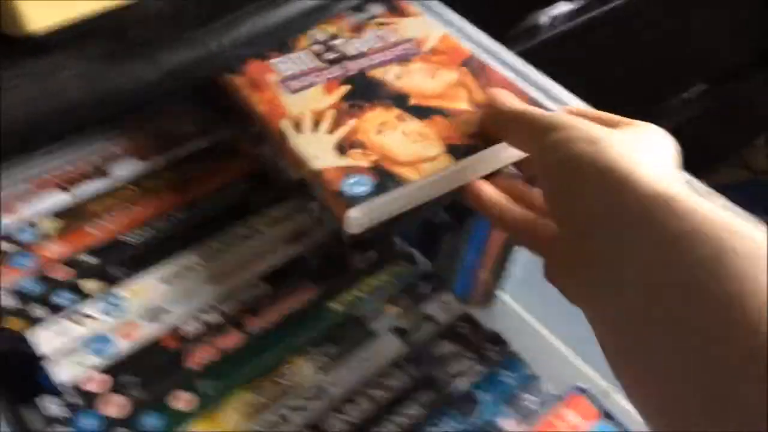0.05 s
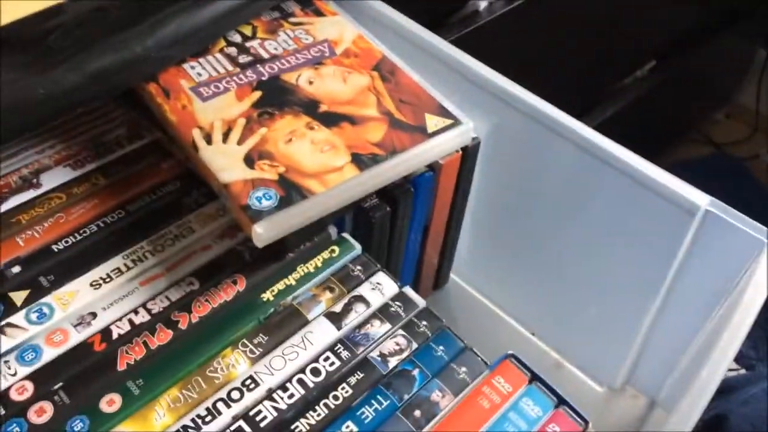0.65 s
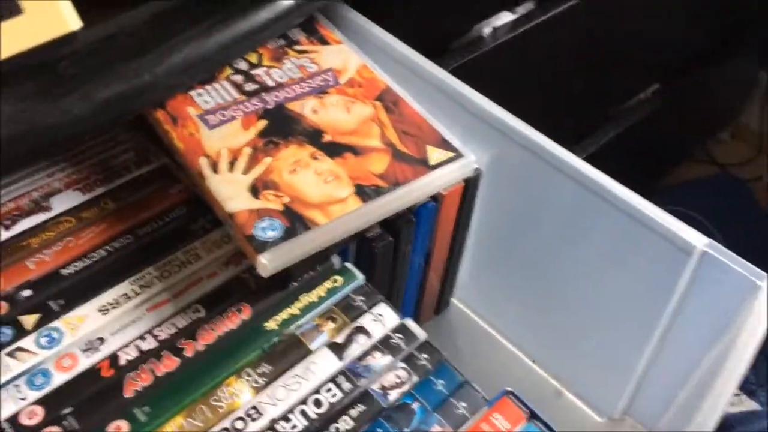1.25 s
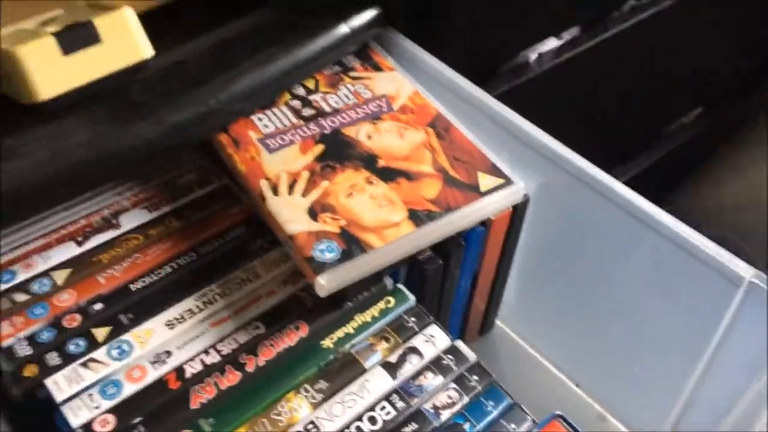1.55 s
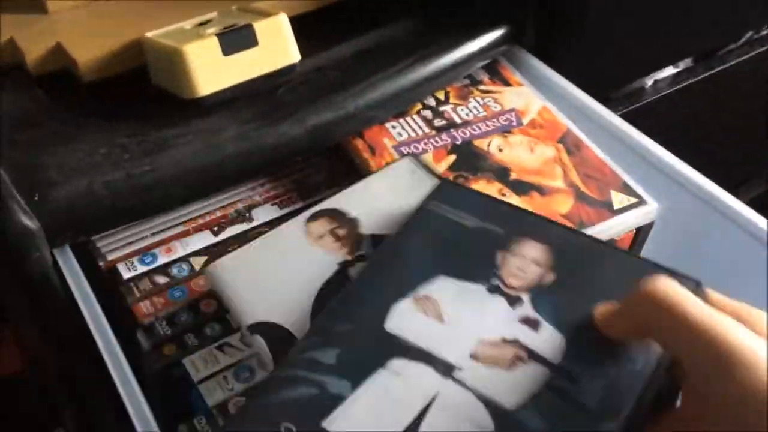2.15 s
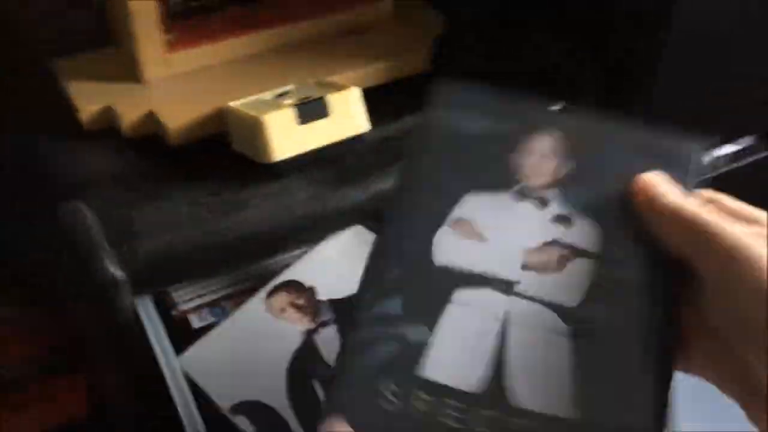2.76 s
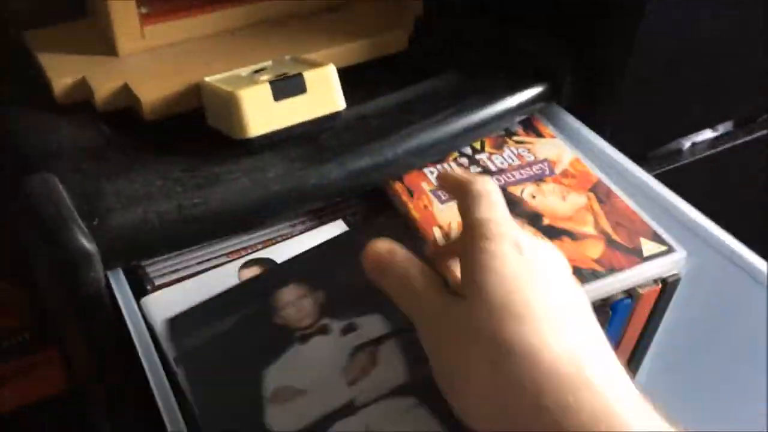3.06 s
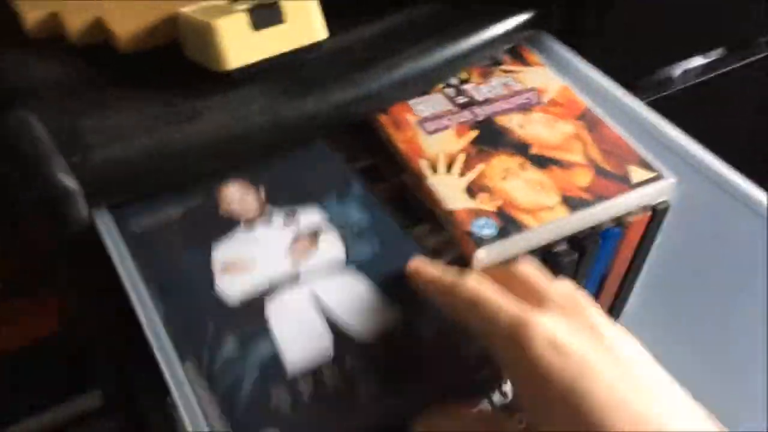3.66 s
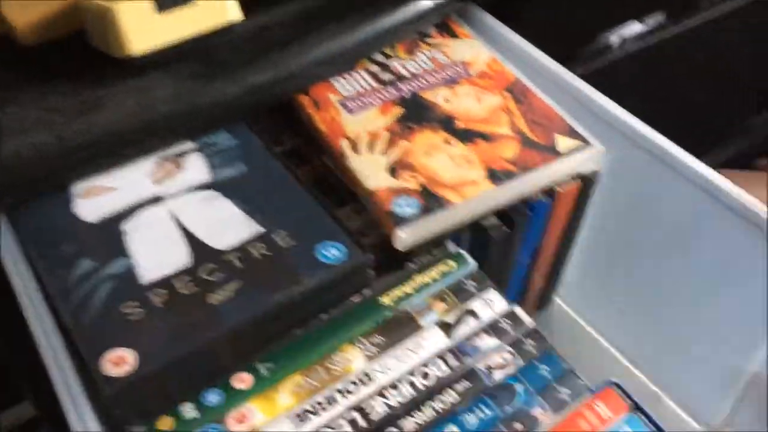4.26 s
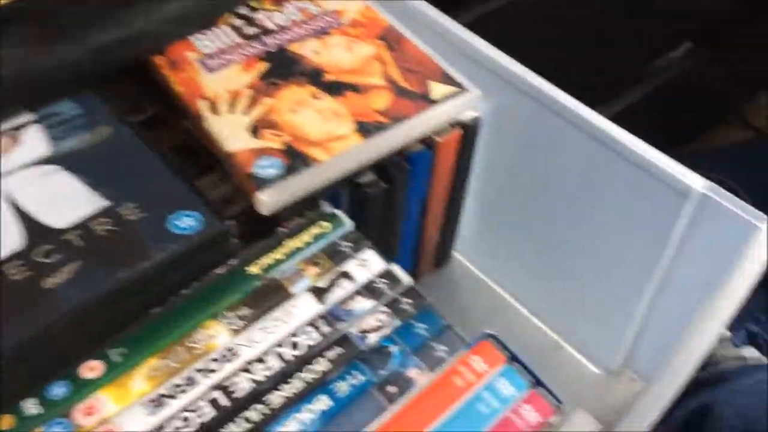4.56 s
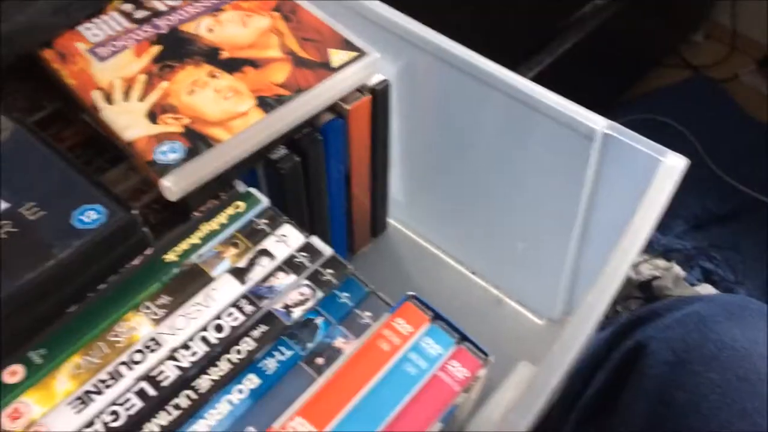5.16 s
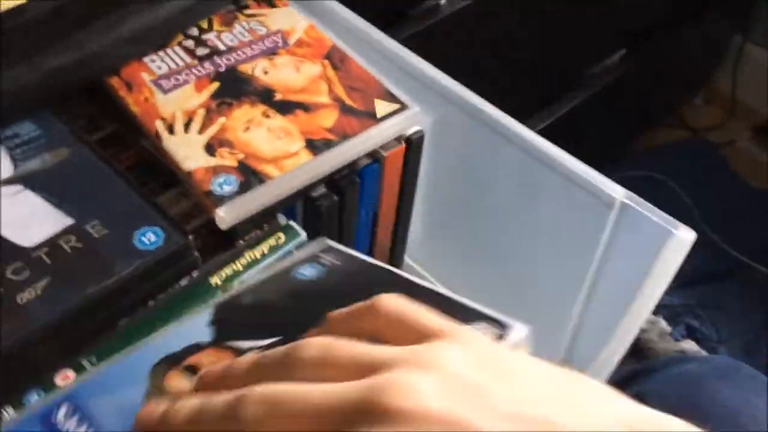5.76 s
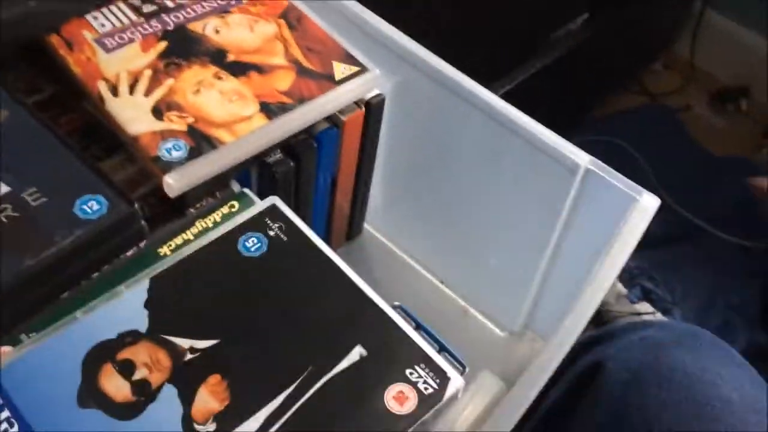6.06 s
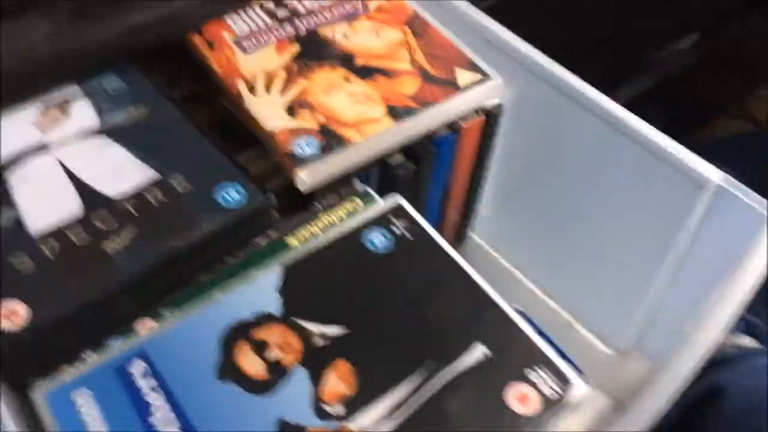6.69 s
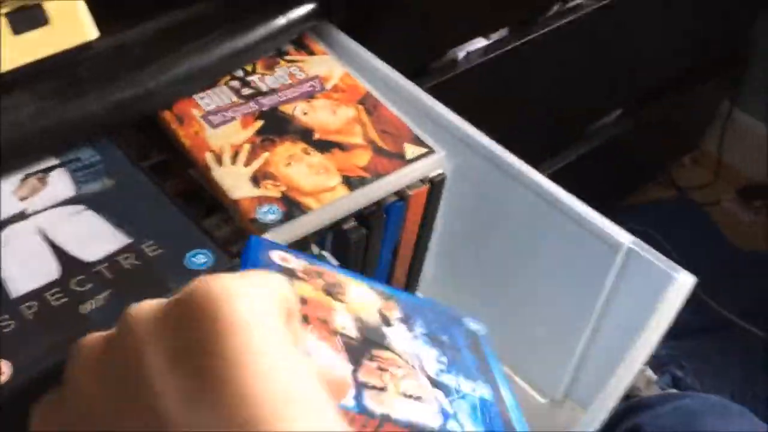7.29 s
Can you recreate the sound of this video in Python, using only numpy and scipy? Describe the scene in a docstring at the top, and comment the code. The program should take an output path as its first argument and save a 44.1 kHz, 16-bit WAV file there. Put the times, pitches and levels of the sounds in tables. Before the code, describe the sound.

Plastic disc cases are handled in a plastic storage drawer, close to the microphone. A quick clatter opens, followed by light ticks, then about two seconds of busy clacking and scraping, with hollow thuds from the drawer. After a lull, a case drops with a sharp clatter, and one more clack comes near the end. A sleeve rustles faintly in the quiet, small room.

```python
"""Disc cases in a plastic drawer

Plastic cases are lifted, shuffled and dropped close to the microphone. Their shells clack
together and the hollow drawer thuds under them; between blows they scrape, tick and skid
by stick-slip. A sleeve rustles faintly, and a small furnished room answers."""
import sys
import numpy as np
from scipy import signal
from scipy.fft import rfft, irfft
from scipy.io import wavfile
from scipy.ndimage import uniform_filter1d

SR = 44100
rng = np.random.default_rng(int(sys.argv[2]) if len(sys.argv) > 2 else 0)


def digitize_waveform(pressure):
    """Quantize a signal to 16-bit integers and store it at the path in sys.argv[1].

    Rows of a 2-D input are taken as channels; values are limited to [-1, 1].
    """
    field = np.atleast_2d(pressure).T
    bounded = np.clip(field, -1, 1)
    quanta = np.round(bounded * 32767).astype(np.int16)
    wavfile.write(sys.argv[1], SR, quanta)


N = 323253
TIME_S = np.arange(N) / SR
BLOW_SAMPLES = round(0.008 * SR)

# hand pushes a case along its neighbours: (peak time [s], level [dB], build-up [s], let-go [s])
PUSHES = [(.04, -35.5, 0.093, 0.32), (.97, -56, 0.26, 0.095), (1.32, -50, 0.3, 0.21),
          (1.65, -45, 0.21, 0.076), (1.92, -42.5, 0.14, 0.13), (2.26, -35, 0.14, 0.037),
          (2.48, -31.5, 0.079, 0.36), (2.68, -34.5, 0.14, 0.12), (3.1, -25.5, 0.12, 0.043),
          (3.27, -32, 0.14, 0.049), (3.71, -48.5, 0.36, .3), (3.98, -39.5, 0.055, 0.06),
          (4.47, -64, .1, 0.22), (4.95, -59, 0.31, .2), (5.31, -51, 0.37, 0.21), (6.0, -39.5, 0.12, 0.23),
          (6.66, -56, 0.34, 0.73), (7.27, -39, 0.11, 0.24)]


def amp(db):
    """Decibels to gain."""
    return 10 ** (np.asarray(db) / 20)


def unit_rms(x):
    """Scale to rms 1."""
    return x / np.sqrt(np.mean(x ** 2) + 1e-20)


def unit_blow(x):
    """Scale to the energy of BLOW_SAMPLES at rms 1."""
    return x * np.sqrt(BLOW_SAMPLES / (np.sum(x ** 2) + 1e-20))


def lookup(points, hz):
    """Interpolate a table over log frequency."""
    points_hz, values = np.transpose(points)
    return np.interp(np.log(hz + 1), np.log(points_hz + 1), values)


def add(mix, start_s, sound):
    """Mix a sound in at start_s."""
    part = mix[max(round(start_s * SR), 0):][:len(sound)]
    part += sound[:len(part)]


def band(x, low_hz, high_hz):
    """Causal band-pass."""
    return signal.sosfilt(signal.butter(3, [low_hz, high_hz], "band", fs=SR, output="sos"), x)


def coloured(x, db_at, size=4096):
    """Minimum-phase filter with response db_at(hz)."""
    log_gain = np.log(amp(db_at(abs(np.fft.fftfreq(size, 1 / SR)))))
    taps = np.fft.ifft(np.exp(np.conj(signal.hilbert(log_gain)))).real
    return signal.oaconvolve(x, taps[:size // 2])[:len(x)]


def noise(spectrum):
    """Steady coloured noise, rms 1."""
    return unit_rms(coloured(rng.standard_normal(N), lambda hz: lookup(spectrum, hz)))


def wander(rate_hz, size=4096):
    """Slow random drift, rms 1."""
    t = np.linspace(0, N / SR, size)
    lowpass = np.exp(-(np.fft.rfftfreq(size, t[1]) / rate_hz) ** 2)
    drift = irfft(rfft(rng.standard_normal(size)) * lowpass)
    return np.interp(TIME_S, t, unit_rms(drift))


def hump(hz, centre_hz, width_hz):
    """Resonance shape, 1 at its centre."""
    return 1 / (1 + (2 * (hz - centre_hz) / width_hz) ** 2)


def slips(per_s, spread_db):
    """Random stick-slip clicks, a few of them large."""
    sizes = amp(spread_db * np.minimum(rng.exponential(1, N), 4))
    return sizes * rng.choice([-1, 1], N) * (rng.random(N) < per_s / SR)


def effort_db(efforts, swell_db=20, curve=1.35):
    """Strongest effort at each instant; each spans swell_db over its build-up and its let-go."""
    levels_db = [db - swell_db * np.maximum((peak_s - TIME_S) / up_s, (TIME_S - peak_s) / down_s) ** curve
                 for peak_s, db, up_s, down_s in efforts]
    return np.max(levels_db, axis=0)


def shell_db(hz):
    """Response of a case: narrow modes on a broad slope."""
    # broad response: (frequency [Hz], gain [dB])
    slope = [(120, -3.5), (300, 1), (560, -0.5), (900, 3.5), (1500, 5), (2400, 1), (3300, -3.5),
             (3850, -11), (4350, -15), (7500, -18), (11000, -22.5), (15000, -33)]
    # shell modes: (frequency [Hz], width [Hz], gain re slope [dB])
    modes = [(668, 35, 3), (897, 58, 2.5), (1004, 50, 3.5), (1220, 76, -1), (1759, 30, -0.5),
             (2070, 87, 1.5), (2580, 7, 4), (3100, 25, 5), (3520, 30, -3.5), (5000, 41, 3), (5440, 38, 1.5),
             (5820, 65, 2), (6400, 110, 3), (7370, 160, 2), (9350, 80, -0.5)]
    return lookup(slope, hz) + sum(db * hump(hz, mode_hz, width_hz) for mode_hz, width_hz, db in modes)


def scrape(gain_db=-2, grip_db=4, grip_hz=35, bite_db=-47, bite_range_db=3):
    """Fingers rub dully; under more pressure the plastic bites and slips ring the shells."""
    # fingers on a case: (frequency [Hz], gain [dB])
    fingers = [(150, -11), (300, -8.5), (480, -4.5), (650, -5), (900, 0.5), (1400, -7), (2150, -5),
               (2800, -16.5), (4000, -20.5), (12000, -42.5)]
    push_db = effort_db(PUSHES)
    bite = 1 / (2 + np.exp((bite_db - push_db) / bite_range_db))
    friction = slips(per_s=700, spread_db=5) * amp(grip_db * wander(grip_hz))
    plastic = unit_rms(band(coloured(friction, shell_db), 280, 3800))
    skin = unit_rms(coloured(friction, lambda hz: lookup(fingers, hz)))
    return amp(gain_db + push_db) * (bite * plastic + (1 - bite) * skin)


def hiss_and_rumble(hiss_db=-2.5, rumble_db=-2, sway_db=-3.5, flutter_db=3, lumps_db=3):
    """Soft high hiss of sleeve swishes and a knock's brief tail; the jostled drawer rumbles."""
    # sleeve swishes and one hissy knock tail: (peak time [s], length [s], relative level [dB])
    hiss_swells = [(0.101, 0.22, -44.5), (0.368, 0.066, -50), (0.894, 0.29, -59), (1.363, 0.34, -61),
                   (1.647, 0.13, -56.5), (2.18, 0.38, -60), (2.51, 0.25, -47.5), (2.81, 0.072, -50.5),
                   (3.092, 0.23, -51.5), (3.506, 0.2, -54.5), (3.848, .2, -48.5), (4.89, 0.28, -61),
                   (5.236, 0.38, -61), (5.6, .24, -68.5), (6.04, .16, -53.5), (6.641, 0.52, -59),
                   (7.3, 0.38, -61)]
    # high hiss: (frequency [Hz], gain [dB])
    hiss_spectrum = [(1000, -12), (3000, -6), (5500, 8), (8000, 3.5), (12500, -0.5), (15500, -9.5)]
    # drawer jostles: (peak time [s], relative level [dB], build-up [s], let-go [s])
    jostles = [(.2, -24, 0.054, 0.043), (.88, -56.5, 0.19, 0.28), (2.14, -46, 0.14, .18),
               (2.58, -41.5, 0.18, 0.23), (3.84, -47.5, 0.21, .1), (4.55, -57.5, .1, 0.11),
               (6.0, -33.5, 0.063, 0.14), (6.14, -41.5, .1, 0.051), (6.6, -61.5, 0.2, 0.45),
               (7.33, -51, .12, .1)]
    # drawer rumble: (frequency [Hz], gain [dB])
    rumble_spectrum = [(20, -5.5), (45, -5), (80, 1), (190, 6.5), (290, -7), (420, -16), (800, -24),
                       (2000, -36.5)]
    envelope = sum(amp(db) * np.exp(-(2 * (TIME_S - peak_s) / length_s) ** 2)
                   for peak_s, length_s, db in hiss_swells)
    grains = slips(per_s=4000, spread_db=4) * amp(flutter_db * wander(rate_hz=40))
    hiss = unit_rms(coloured(grains, lambda hz: lookup(hiss_spectrum, hz)))
    shaking = amp(effort_db(jostles)) + amp(sway_db) * envelope
    rumble = unit_rms(noise(rumble_spectrum) * amp(lumps_db * wander(rate_hz=25)))
    return amp(hiss_db) * envelope * hiss + amp(rumble_db) * shaking * rumble


def even_burst(burst, blur_hz=900):
    """Flatten a noise burst's broad spectrum so each clack keeps its set tone colour."""
    hz = np.fft.rfftfreq(len(burst), 1 / SR)
    power = uniform_filter1d(abs(rfft(burst)) ** 2, max(round(blur_hz / hz[1]), 1))
    flatten_db = -10 * np.log10(abs(power) + 1e-12)
    return coloured(burst, lambda f: np.interp(f, hz, flatten_db), size=512)


def clack(face_db, body_db, edge_db, ring_hz, t60_s, chatter, ring_db=8, trim_db=-1.5):
    """Two shells snap together and buzz briefly; the struck spot favours one resonance."""
    t = np.arange(len(chatter)) / SR
    rise_s = 0.0024 * (t60_s / 0.055) ** 2  # glancing blows start softly and last longer
    closing = 1 - np.exp(-t / rise_s)
    force = even_burst(chatter * closing * amp(-60 * t / t60_s))
    shell = coloured(force, lambda hz: shell_db(hz) + ring_db * hump(hz, ring_hz, 0.19 * ring_hz))
    body = amp(body_db + trim_db) * unit_blow(band(shell, 250, 720))
    face = unit_blow(band(shell, 700, 4600))
    edge = amp(edge_db + trim_db) * unit_blow(band(shell, 4900, 17000))
    return amp(face_db) * (body + face + edge)


def ticks(count=55, tick_db=-50.5, ref_push_db=-46, db_per_db=0.96, spread_db=1.5, crowding=0.45):
    """Fingers and loose cases catch at random, louder and denser under a harder push."""
    out, push_db = np.zeros(N), effort_db(PUSHES)
    travel = np.cumsum(amp(crowding * push_db))
    onsets = np.searchsorted(travel, (np.arange(count) + rng.random(count)) * travel[-1] / count)
    scatters_db = spread_db * rng.standard_normal(count)
    for onset, scatter_db, chatter in zip(onsets, scatters_db, rng.standard_normal((count, 4096))):
        db = tick_db + db_per_db * (push_db[onset] - ref_push_db) + scatter_db
        tick = clack(db, body_db=-7, edge_db=-7, ring_hz=1200, t60_s=0.024, chatter=chatter)
        add(out, onset / SR, tick)
    return out


def thuds(gain_db=2, rise_s=0.0072, walls_db=-4, push_db=-8, push_s=0.00092, size=8192):
    """A soft push swings the stack at one low pitch and stirs the drawer's wall modes."""
    # stack and drawer take a load: (time [s], relative level [dB], pitch [Hz], t60 [s])
    loads = [(.053, -18.5, 213, 0.02), (.074, -31.5, 192, 0.08), (0.162, -24.5, 267, 0.1),
             (.198, -18.5, 210, 0.048), (.206, -23, 98, 0.031), (.358, -22.5, 285, 0.022),
             (0.371, -34, 201, 0.065), (1.115, -43.5, 179.4, .1), (1.941, -28.5, 260, 0.06),
             (1.947, -26.5, 128, 0.086), (2.276, -26, 268, .044), (2.503, -28.5, 186, 0.079),
             (2.524, -35, 214, 0.052), (2.829, -39.5, 148, 0.064), (3.015, -32, 79.5, 0.057),
             (3.049, -28.5, 198, .051), (3.085, -26, 325, 0.038), (3.217, -24.5, 130, .08),
             (3.376, -41.5, 204, 0.039), (3.499, -28.5, 195, 0.072), (3.528, -27, 353, 0.031),
             (3.659, -34, 185, 0.031), (3.793, -30.5, 284, 0.035), (3.866, -27.5, 263, 0.021),
             (3.996, -20.5, 430, 0.057), (4.001, -25, 267.6, 0.12), (4.043, -34, 142.6, 0.04),
             (5.344, -38.5, 370, 0.066), (5.473, -51, 402, .026), (5.856, -31, 195, 0.13),
             (5.909, -35, 89, 0.052), (5.985, -26.5, 266, .11), (6.012, -32, 142.3, 0.068),
             (6.385, -40.5, 136, 0.13), (7.202, -31, 286, 0.035), (7.206, -35, 170.6, 0.068)]
    # hollow drawer response: (frequency [Hz], gain [dB])
    drawer = [(30, -31.5), (70, -13), (105, -4.5), (135, 3.5), (160, -3), (198, 8.5), (232, -9), (270, 2),
              (320, -6.5), (400, -0.5), (600, -28), (1500, -59.5)]
    out, t = np.zeros(N), np.arange(size) / SR
    push = unit_blow(band((1 - t / push_s) * np.exp(-t / push_s), 37, 170))
    for (start_s, db, pitch_hz, t60_s), stir in zip(loads, rng.standard_normal((len(loads), size))):
        envelope = (1 - np.exp(-t / rise_s)) * amp(-60 * t / t60_s)
        swing = unit_blow(envelope * np.sin(2 * np.pi * pitch_hz * t))
        walls = unit_blow(coloured(envelope * stir, lambda hz: lookup(drawer, hz)))
        add(out, start_s, amp(db) * (swing + amp(walls_db) * walls + amp(push_db) * push))
    return amp(gain_db) * out


def knocks(rebound_db=-21, min_delay_s=0.012, delay_spread_s=0.03):
    """Case strikes case, then rocks back once, more softly."""
    # blows: (time [s], face level [dB], body offset [dB], edge offset [dB], ring [Hz], t60 [s])
    blows = [(.054, -37, 14.5, -5.5, 576, 0.028), (.107, -25.5, -1.5, -6, 780, .032),
             (.129, -24, -4.5, -20, 1210, 0.034), (0.168, -27, -0.5, -17, 1130, 0.052),
             (.194, -20, -1.5, -10.5, 1890, 0.02), (0.209, -30, 10.5, -29, 830, 0.023),
             (.358, -13.5, -11.5, -12, 1290, 0.021), (.396, -39.5, 1, -4.5, 1180, 0.027),
             (.944, -55, 1, -15, 1150, 0.039), (1.122, -32.5, -8, -3, 1920, 0.023),
             (1.166, -36, -4, -15, 935, 0.03), (1.174, -40, 4.5, -7, 750, 0.055),
             (1.532, -44, -6, -5, 2000, 0.04), (1.547, -39.5, -14, -10, 1850, 0.044),
             (1.672, -32, -10, -18, 1310, 0.016), (1.852, -41.5, -15, -16.5, 1423, .05),
             (1.918, -38, -5.5, -7.5, 1800, 0.051), (1.942, -14.5, -5, -2, 1920, 0.027),
             (1.981, -33.5, 3.5, -5, 1020, 0.033), (2.082, -43, -0.5, -4, 1398, 0.06),
             (2.166, -40.5, -18, -8, 1010, 0.051), (2.212, -12, -6, -11, 960, 0.026),
             (2.224, -22.5, -10, -6.5, 940, 0.038), (2.253, -21, -12.5, -13.5, 930, 0.043),
             (2.274, -21.5, -11, -16.5, 885, .022), (2.327, -30, -9, -5, 1400, 0.035),
             (2.439, -34.5, -5, -18.5, 1017, 0.031), (2.471, -18, -10.5, -10.5, 1180, 0.042),
             (2.56, -23, -1, -27, 1360, 0.019), (2.584, -27, -5, -11, 1970, 0.068),
             (2.627, -29, -13, -13.5, 2470, .034), (2.659, -35.5, 5.5, -13.5, 1880, 0.054),
             (2.684, -29.5, -30, -12, 2820, 0.045), (2.802, -28, -36, -7.5, 2060, 0.1),
             (2.835, -30, -30.5, -24, 917, 0.04), (2.95, -35, -21.5, -12, 963, 0.068),
             (3.008, -28.5, -8, -14.5, 1740, 0.057), (3.032, -42, 8.5, -8, 824, 0.018),
             (3.069, -15.5, -4.5, -18, 960, 0.053), (3.089, -26, 0, -2.5, 2760, 0.043),
             (3.128, -28, -22, -13.5, 1040, .032), (3.215, -20, -3.5, -10, 2320, 0.04),
             (3.259, -28.5, -7, -14, 2853, .024), (3.38, -51, -6.5, 3, 1155, 0.035),
             (3.491, -34.5, -1.5, -19, 2730, 0.14), (3.52, -27, -0.5, -19.5, 940, 0.043),
             (3.61, -39.5, -14, -15, 1058, .066), (3.78, -28.5, -25, -26, 3000, 0.011),
             (3.795, -25.5, -3.5, -18, 1640, 0.038), (3.843, -26, -9.5, -17, 1800, 0.043),
             (3.863, -31, 1, -10.5, 1050, .021), (3.988, -23, 2.5, -11.5, 1250, 0.045),
             (3.998, -18, -2.5, -16, 524, 0.026), (4.018, -26.5, -4, -11.5, 2870, 0.056),
             (4.152, -45, -2.5, -11.5, 1760, 0.019), (4.674, -53, 11.5, -2, 560, 0.022),
             (4.697, -43.5, 1, -7.5, 800, 0.071), (5.051, -51, 1.5, -15, 970, 0.016),
             (5.345, -31.5, -10, -5, 2090, 0.031), (5.379, -41, -6.5, -6.5, 1700, 0.042),
             (5.627, -54, -10, -12, 1020, .035), (5.752, -51, -15.5, -6.5, 1764, 0.031),
             (5.855, -16.5, -7.5, 2, 2540, 0.011), (5.91, -26.5, -1.5, -18, 960, 0.032),
             (5.927, -24, -22, -26, 1730, 0.02), (5.984, -11.5, -9.5, -16.5, 1810, 0.04),
             (5.998, -13, -11, -14.5, 1010, 0.031), (6.012, -24, -21, -17.5, 1184, 0.033),
             (6.09, -23, -25, -14.5, 860, .022), (6.095, -20, -10, -17, 3080, 0.024),
             (6.16, -31.5, -9, -21, 2050, 0.075), (6.222, -49, -8.5, -19, 1056, 0.025),
             (6.268, -50, -13.5, -21, 1074, 0.063), (6.386, -40.5, -8, -3, 1590, 0.053),
             (6.403, -36.5, -0.5, 0, 1590, 0.044), (6.754, -53, 3, -3, 1150, 0.033),
             (6.818, -46.5, -2.5, -7.5, 1630, 0.027), (6.898, -48.5, 1, -11, 2180, 0.023),
             (7.048, -40.5, -14, -12, 925, 0.021), (7.114, -45.5, -14, -19, 980, 0.025),
             (7.186, -28.5, -6, -18, 3030, 0.13), (7.198, -13, -10, -5.5, 1880, 0.017),
             (7.2181, -26, -4.5, -4, 3000, 0.059), (7.294, -39.5, -9, -19.5, 1620, 0.036)]
    out = np.zeros(N)
    chatters = rng.standard_normal((len(blows), 4096))
    delays_s = min_delay_s + delay_spread_s * rng.random(len(blows))
    for (start_s, *blow), chatter, delay_s in zip(blows, chatters, delays_s):
        hit = clack(*blow, chatter)
        add(out, start_s, hit)
        add(out, start_s + delay_s, amp(rebound_db) * hit)
    return out


def skids(gain_db=-2, relative_width=0.28, taper=0.61):
    """A corner skids over plastic: a swell of dense slips ringing at one pitch."""
    # strokes: (start [s], length [s], relative level [dB], squeak [Hz], squeak boost [dB])
    strokes = [(1.097, 0.046, -44.5, 1800, 3), (1.258, 0.045, -53, 1300, 3), (1.36, 0.1, -56, 1100, 6.5),
               (1.646, 0.064, -41.5, 1310, 17.5), (1.942, 0.068, -28, 1440, 3.5),
               (2.08, 0.056, -44.5, 2240, 6), (2.229, 0.051, -27, 930, 8), (2.481, 0.023, -28.5, 2600, 12),
               (2.629, 0.063, -32, 2630, 7.5), (2.677, 0.018, -33.5, 3640, 17), (2.709, .06, -40, 2240, 9),
               (2.792, .026, -33, 2360, 20), (2.871, 0.05, -37.5, 2720, 15.5),
               (3.061, 0.061, -26.5, 2660, 15), (3.129, 0.056, -35.5, 2660, 11),
               (3.219, 0.072, -33, 2470, 12), (3.598, 0.091, -45.5, 2700, 4), (3.71, 0.053, -53, 2310, 6),
               (3.802, .099, -39, 1990, 3), (4.674, 0.054, -46.5, 1106, 17),
               (5.227, 0.047, -50.5, 2410, 38), (5.229, 0.03, -55, 3470, 26), (5.477, .049, -53, 2380, 4.5),
               (5.624, .06, -59, 2880, 6), (5.845, .062, -23.5, 2725, 6.5), (5.908, 0.047, -29.5, 2740, 10),
               (6, 0.031, -24.5, 2700, 11.5), (6.083, 0.013, -32, 6700, 13),
               (6.098, 0.049, -33.5, 2780, 10.5), (6.723, 0.075, -56, 1190, 1)]
    # plastic on plastic: (frequency [Hz], gain [dB])
    sliding = [(150, -19.5), (350, -5), (580, -10), (900, 2.5), (1300, -4), (2000, -2.5), (3300, -7.5),
               (3800, -10.5), (4300, -16.5), (7000, -16), (11000, -28.5), (15000, -37)]
    out, friction = np.zeros(N), slips(per_s=5000, spread_db=2)
    for start_s, length_s, db, squeak_hz, boost_db in strokes:
        stroke = friction[round(start_s * SR):][:max(round(length_s * SR), BLOW_SAMPLES)]
        stroke = np.pad(stroke * signal.windows.tukey(len(stroke), taper), (0, BLOW_SAMPLES))
        width_hz = relative_width * squeak_hz
        skid = coloured(stroke, lambda hz: lookup(sliding, hz) + boost_db * hump(hz, squeak_hz, width_hz))
        add(out, start_s, amp(db) * unit_rms(skid))
    return amp(gain_db) * out


def room(x, first_echo_s=0.0044, echoes_per_s=3000, size=16384):
    """Sparse echoes off drawer walls, furniture and room; each band decays at its own rate."""
    # room decay: (frequency [Hz], t60 [s])
    decay = [(100, 0.15), (300, 0.18), (1000, 0.15), (3000, 0.14), (7000, 0.15), (14000, 0.12)]
    # echo strength: (frequency [Hz], gain [dB])
    strength = [(100, -4.5), (400, -11), (1000, -7), (3000, -7), (7000, -9), (14000, -10)]
    taps = rng.choice([-1., 1.], size) * (rng.random(size) < echoes_per_s / SR)
    taps *= np.arange(size) > first_echo_s * SR
    hz, t, spectra = signal.stft(taps, SR, nperseg=256)
    tail = signal.istft(spectra * amp(-60 * t / lookup(decay, hz)[:, None]), SR)[1]
    tail = coloured(tail / np.linalg.norm(tail), lambda f: lookup(strength, f))
    return signal.oaconvolve(x, tail)[:N]


def moving_echoes(direct, turn_hz=1.7, patterns=3):
    """The cases change place, so the echoes shift in level and pattern."""
    # room share, set by distance from the microphone: (time [s], send [dB])
    distance = [(0, 1.5), (.36, -5.5), (1.2, 2.5), (2.2, -0.5), (3.1, -3.5), (4.0, -1), (5.3, 2.5),
                (6.0, -3), (7.2, -1)]
    send = direct * amp(np.interp(TIME_S, *np.transpose(distance)))
    angle = 2 * np.pi * turn_hz * TIME_S
    echoes = sum(room(send * np.cos(angle + np.pi * k / patterns)) for k in range(patterns))
    return echoes * np.sqrt(2 / patterns)


def air(level_db=-64):
    """Quiet, steady room air."""
    # air noise: (frequency [Hz], gain [dB])
    spectrum = [(18, -31), (30, -7.5), (134, -1), (303, -10.5), (512, -9), (584, -17), (2170, -19),
                (3980, -27.5), (11700, -29.5), (16000, -33)]
    return amp(level_db) * noise(spectrum)


def scene():
    """Cases, drawer and sleeve in the room; mono."""
    direct = knocks() + ticks() + thuds() + skids() + scrape() + hiss_and_rumble()
    return (direct + moving_echoes(direct) + air())[None]


def record(dry, low_hz=35, high_hz=16300):
    """Microphone: bass cut, clip at full scale, band limit."""
    bass_cut = signal.butter(2, low_hz, "high", fs=SR, output="sos")
    clipped = np.clip(signal.sosfilt(bass_cut, dry), -1, 1)
    band_limit = signal.firwin(401, high_hz, window=("kaiser", 9), fs=SR)
    return signal.oaconvolve(clipped, band_limit[None], "same")


dry = scene()
out = record(dry)
digitize_waveform(out)
```